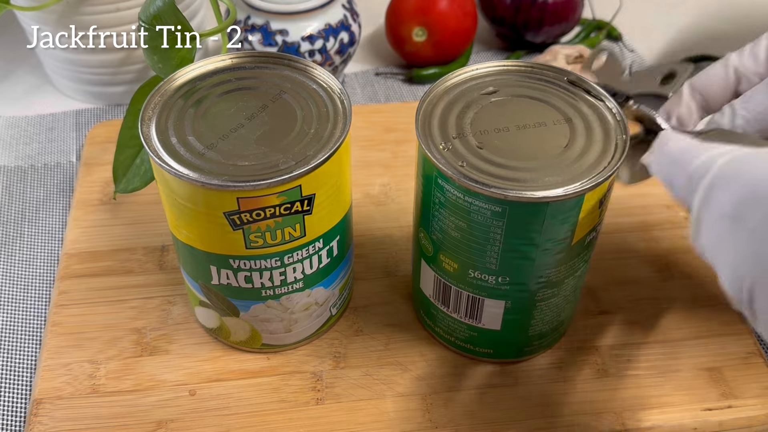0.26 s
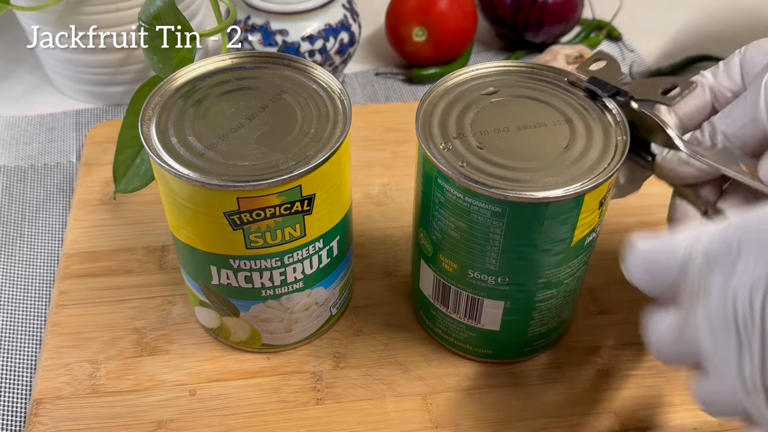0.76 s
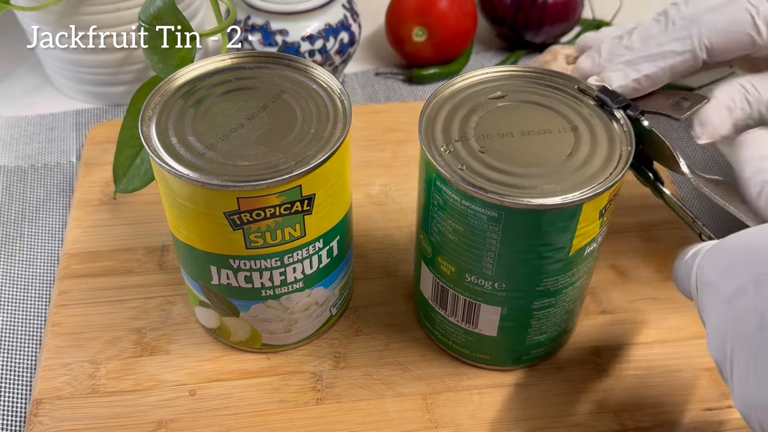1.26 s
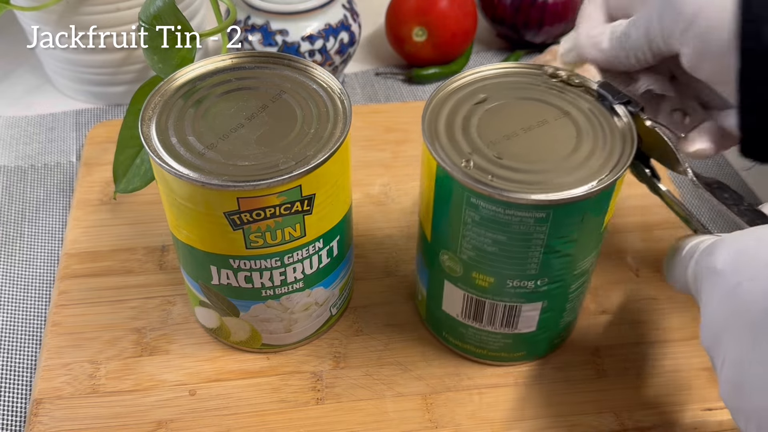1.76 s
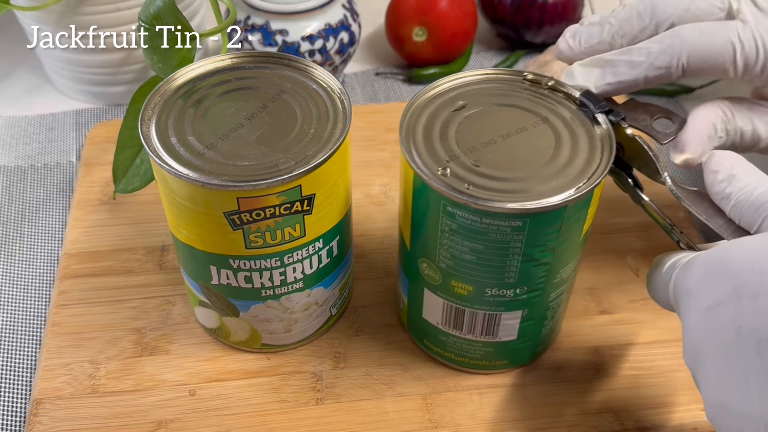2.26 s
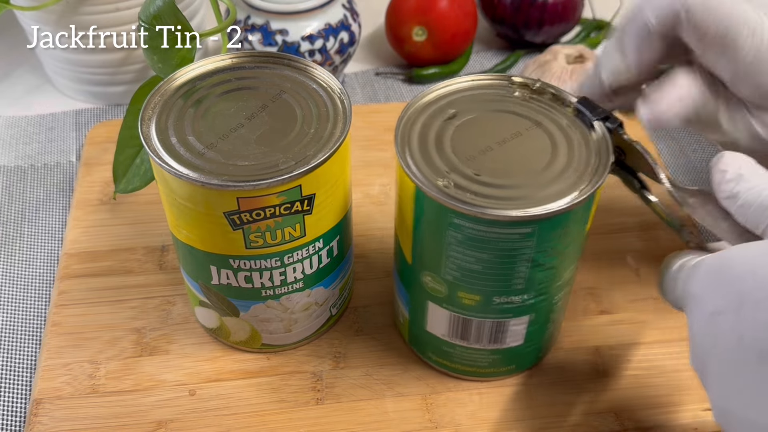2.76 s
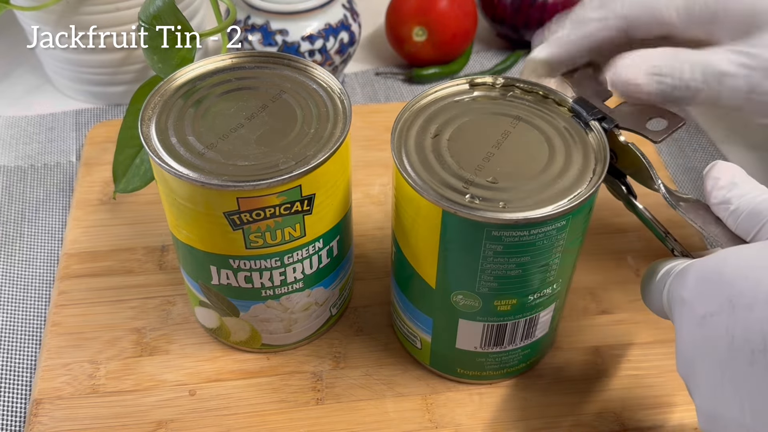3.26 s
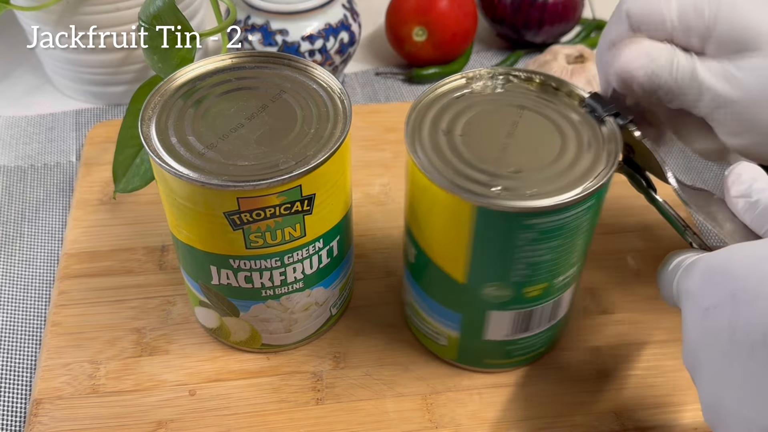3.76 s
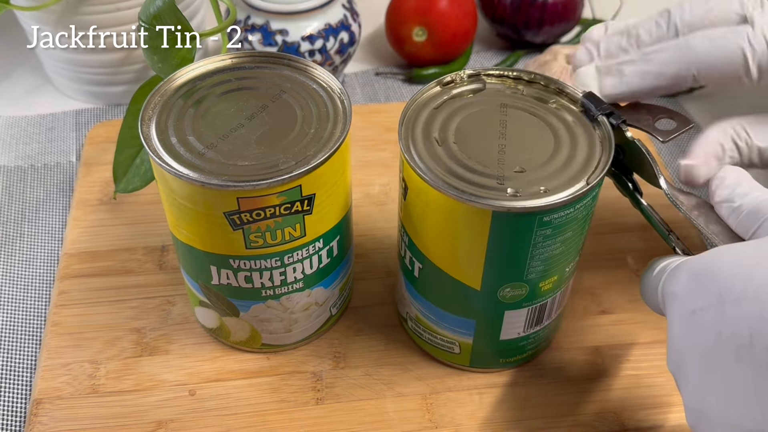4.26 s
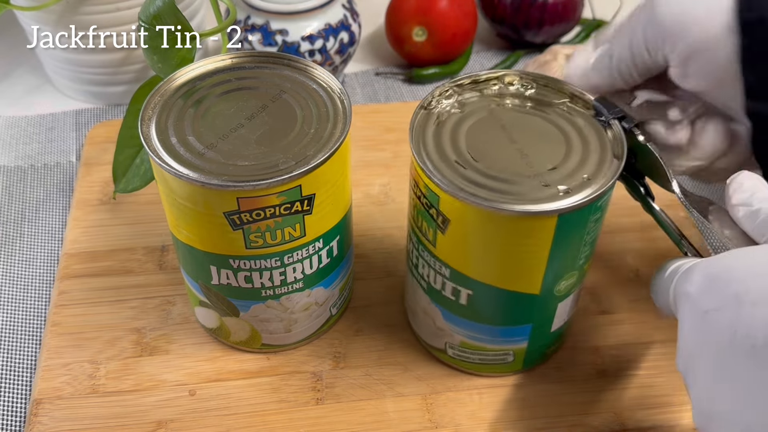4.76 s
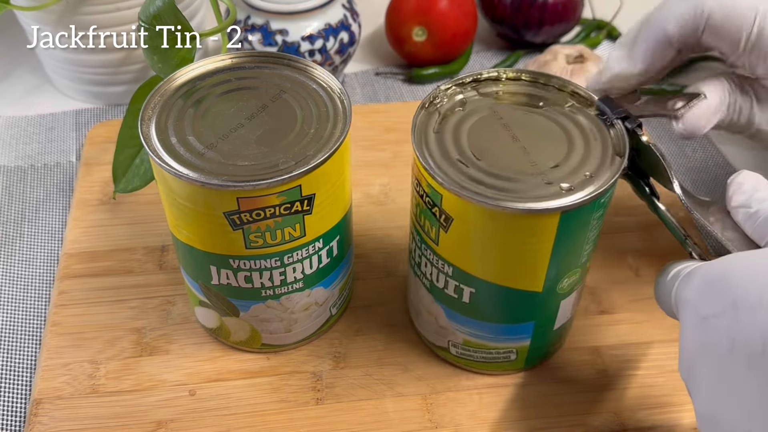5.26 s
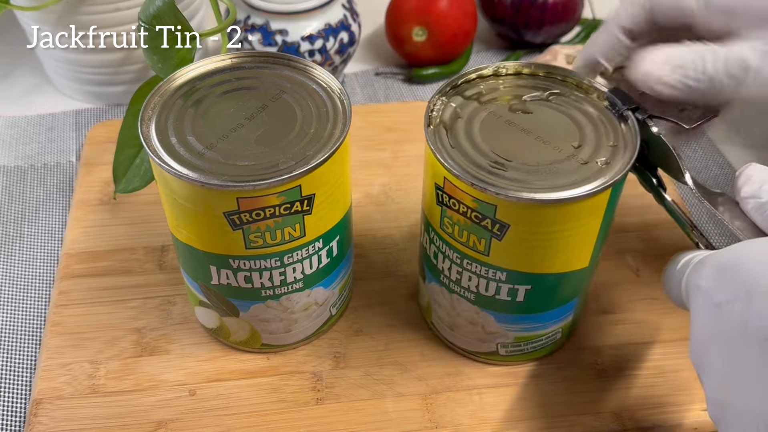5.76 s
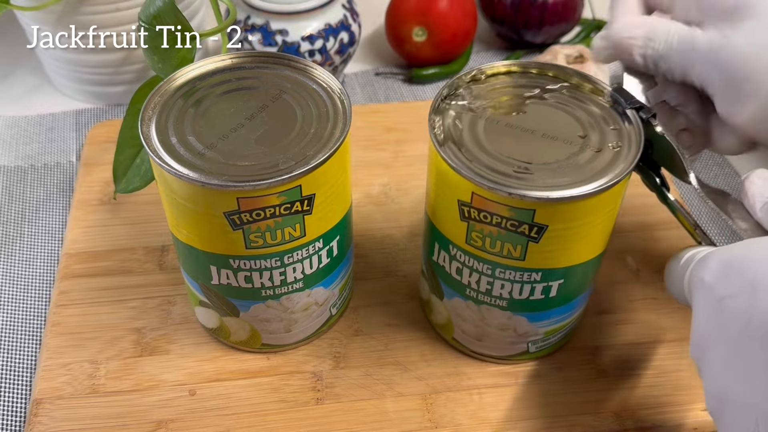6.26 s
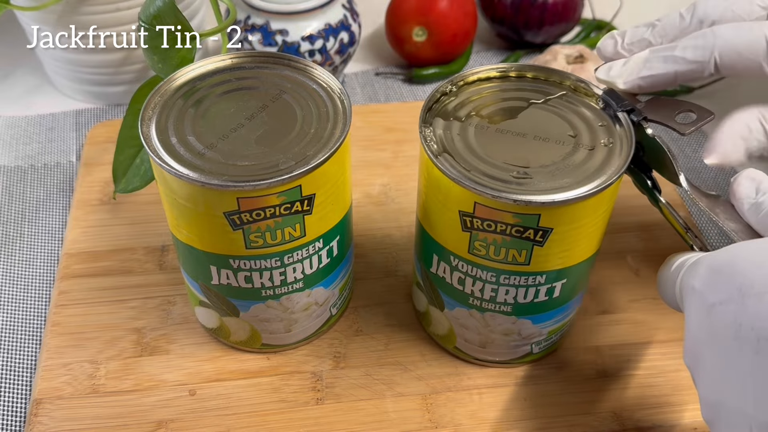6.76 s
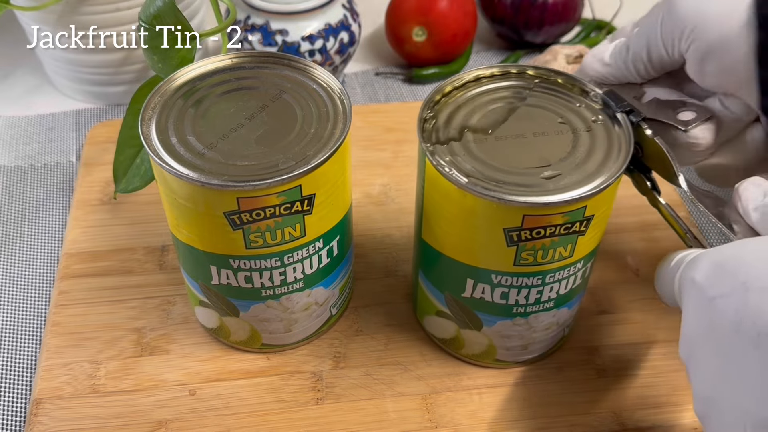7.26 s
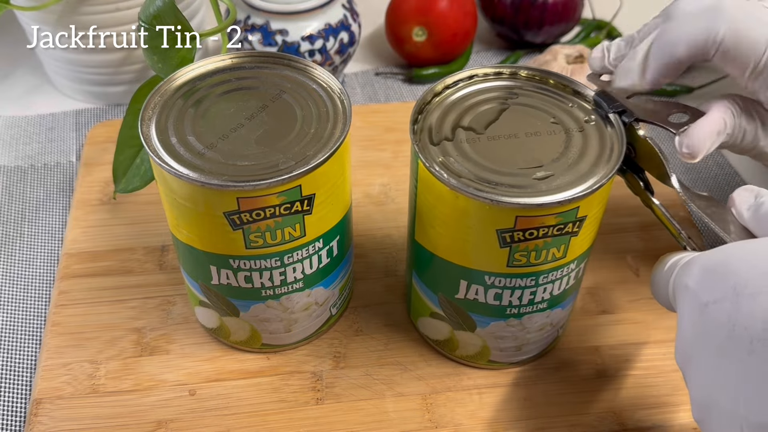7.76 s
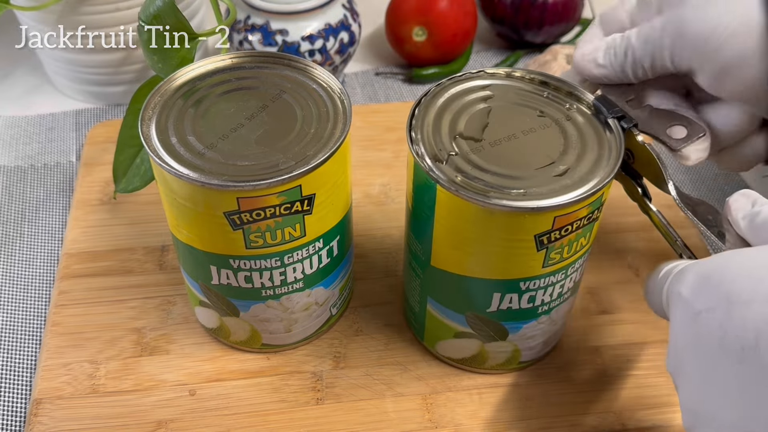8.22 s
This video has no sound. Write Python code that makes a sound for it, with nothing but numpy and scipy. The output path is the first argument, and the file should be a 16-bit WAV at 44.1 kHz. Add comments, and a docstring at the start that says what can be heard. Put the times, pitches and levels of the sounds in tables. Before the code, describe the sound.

Close up in a quiet kitchen, steel clatters on a tin's rim, then repeated short gritty crunches cut the lid and shake a wooden board.

```python
"""In a kitchen, a hand-cranked opener is clamped on a full steel tin that stands on a wooden board.
A gloved hand rustles (friction noise), steel strikes the rim (noise cracks and ringing modes), small parts tick.
Each turn grinds the wheel through the lid in random slips that crack the steel, ring the tin and shake the board.
The tin knocks on the board (a blow swept down by bending waves), the lid squeaks (wavering sines), and after
each turn the glove slides to a new grip."""
import sys
import numpy as np
from scipy import signal
from scipy.fft import rfft, irfft, next_fast_len
from scipy.io import wavfile
from scipy.ndimage import uniform_filter1d

SR = 44100
rng = np.random.default_rng(int(sys.argv[2]) if len(sys.argv) > 2 else 0)


def put_to_file(sound):
    """Save the sound as 16-bit audio at rate SR, in the file named by the first command-line argument."""
    columns = np.atleast_2d(sound).T  # one column per channel
    safe = np.clip(columns, -1, 1)
    whole_steps = np.round(safe * 32767)
    wavfile.write(sys.argv[1], SR, whole_steps.astype(np.int16))


N = 374409
RING = 16384  # samples in one impulse response
T = np.arange(RING) / SR


def amp(db):
    """Decibels to gain."""
    return 10 ** (np.asarray(db) / 20)


def unit(x):
    """Scales to energy 1."""
    return x / np.sqrt(np.sum(x ** 2) + 1e-20)


def read(points, hz):
    """Interpolates a table on a log-frequency axis."""
    f, value = np.transpose(points)
    return np.interp(np.log(hz + 1), np.log(f + 1), value)


def add(mix, start_s, sound):
    """Mixes a sound in at start_s."""
    part = mix[max(round(start_s * SR), 0):][:len(sound)]
    part += sound[:len(part)]


def causal(points):
    """Minimum-phase impulse response with the given spectrum."""
    hz = abs(np.fft.fftfreq(RING, 1 / SR))
    log_gain = np.log(amp(read(points, hz)))
    return np.fft.ifft(np.exp(np.conj(signal.hilbert(log_gain)))).real


def colour(x, points):
    """Filters by a spectrum."""
    return signal.oaconvolve(x, causal(points))[:len(x)]


def noise_burst(t60_s):
    """White noise that dies by 60 dB in t60_s."""
    return rng.standard_normal(RING) * amp(-60 * T / t60_s)


def echoes(decay):
    """Dense random reflections, each band dying at its own speed."""
    hz, t, z = signal.stft(rng.standard_normal(RING), SR, nperseg=256)
    fade = amp(-60 * t / read(decay, hz)[:, None])
    return signal.istft(z * fade, SR, nperseg=256)[1][:RING] / np.sqrt(SR)


def ring(modes, spread_db, length=1, detune=0):
    """Dying modes, whose strength and pitch depend on the spot that is struck and on the grip."""
    hz, db, t60_s = np.transpose(modes)[:, :, None]
    db = db + spread_db * rng.standard_normal(hz.shape)
    hz = hz * (1 + detune * rng.standard_normal(hz.shape))
    decay = amp(db - 60 * T / (t60_s * length))
    sign = rng.choice([-1, 1], hz.shape)
    return (decay * np.sin(2 * np.pi * hz * T) * sign).sum(0)


def bend(x, lag_s):
    """Bending waves in the board: delay falls as 1 / sqrt(Hz) from 60 Hz to 3 kHz, so bass arrives last."""
    hz = np.fft.rfftfreq(2 * RING, 1 / SR)
    delay_s = lag_s * np.maximum(np.sqrt(100 / np.maximum(hz, 60)) - np.sqrt(100 / 3000), 0)
    phase = 2 * np.pi * np.cumsum(delay_s) * hz[1]
    return irfft(rfft(x, 2 * RING) * np.exp(-1j * phase))[:RING]


def slips(count, per_s, spread_db):
    """Random clicks of very uneven size."""
    happens = rng.random(count) < per_s / SR
    size = amp(spread_db * np.minimum(rng.exponential(1, count), 4))
    return happens * size * rng.choice([-1, 1], count)


def steady(x, size):
    """Holds the running rms near 1 and keeps the fine grain; size in samples."""
    power = uniform_filter1d(uniform_filter1d(x ** 2, size), size)
    return x / np.sqrt(abs(power) + 1e-14)


def flutter(x, depth_db):
    """Friction catches and lets go: random patches of level, about 12 ms long and 6 kHz wide."""
    z = signal.stft(x, nperseg=256)[2]
    patches = uniform_filter1d(rng.standard_normal(z.shape), size=36, axis=0)
    patches = uniform_filter1d(patches, size=4, axis=1)
    return signal.istft(z * amp(depth_db * patches / patches.std()), nperseg=256)[1][:len(x)]


def effort(t, rise_s, shape):
    """Level in dB of a hand movement: attack, hold, release."""
    start_db, hold_s, release_db_per_s = shape
    attack = start_db * np.maximum(1 - t / rise_s, 0)
    return attack - release_db_per_s * np.maximum(t - rise_s - hold_s, 0)


# As the lid comes free the tin rings lower, and more faintly under knocks, turns and bites.
SAG_PER_S, RING_FADE_DB_PER_S = .005, 3
# Ringing modes of the tin. Each row: frequency in Hz, level in dB, t60 in s.
TIN_MODES = [(732, -2.5, 0.3), (968, 0.5, 0.081), (1290, -11, 0.084), (1463, -1, 0.038), (1560, 4.5, 0.078),
             (1534, -20.5, 0.82), (1579, 2.5, 0.12), (1965, -5.5, 0.042), (2099, -9.5, 0.22),
             (3030, -3, 0.075), (3500, -16, .09), (3656, -0.5, 0.039), (4013, -10, .06),
             (4620, -22.5, 0.14), (5250, -28.5, 0.048)]


def tin_modes(s):
    """The tin's modes at time s, sinking as the cut grows."""
    return [(hz * (1 - SAG_PER_S * s), db, t60_s) for hz, db, t60_s in TIN_MODES]


# Faint background of the kitchen. Each row: frequency in Hz, gain in dB.
AIR_SPECTRUM = [(20, -30), (60, -22), (120, -6.5), (300, -11), (800, -23.5), (4000, -29), (9000, -27),
                (16000, -34)]


def kitchen_air(air_db):
    """Steady coloured noise, its rms set by air_db."""
    return amp(air_db) * np.sqrt(N) * unit(colour(rng.standard_normal(N), AIR_SPECTRUM))


# Rustle while the opener is being seated. Each row: time in seconds, relative level in dB.
SEATING = [(0, -72), (.33, -68.5), (.6, -72.5), (.95, -63.5), (1.2, -78.5), (1.4, -63.5)]
# Turns of the key. Each row: start in seconds, time to full force in s, and relative levels in dB of the
# board's shudder, the lid's crunch and the following regrip's rustle, then length of that regrip in s.
TURNS = [(1.3, 0.05, -44.5, -56, -66.5, 0.35), (1.54, 0.063, -40, -51.5, -62, 0.4),
         (1.799, 0.0046, -51.5, -59, -63.5, 0.21), (2.68, 0.11, -36, -46, -60.5, .6),
         (3.6, 0.13, -31.5, -48.5, -60.5, 0.63), (4.46, 0.1, -31, -45.5, -61.5, .5),
         (5.28, 0.077, -32, -44.5, -59, .3), (6.08, 0.07, -30, -47, -63, 0.39),
         (6.95, 0.07, -28.5, -45.5, -67.5, 0.52), (7.82, 0.05, -30.5, -44.5, -62.5, 0.26)]
# The glove lets go and slides to a new grip. One row: starting level in dB, hold in s, release in dB per s.
REGRIP_SHAPE = (-10, 0.016, 27)
REGRIP_AFTER_S, REGRIP_RISE_S = .34, 0.047
# Spectra of a glove sliding on steel, the shaken board, the crunching lid.
# Each row: frequency in Hz, gain in dB.
SLIDE_SPECTRUM = [(200, -15), (1000, -1), (3200, 8), (5000, 3), (8000, 7), (11000, 7), (14300, 4.5),
                  (16000, -10)]
SHUDDER_SPECTRUM = [(20, -47), (42, -5.5), (57, 12.5), (80, 4), (110, 15.5), (137, 2), (230, 0), (400, -5),
                    (560, -14.5), (2000, -41), (16000, -76)]
CRUNCH_SPECTRUM = [(200, -12.5), (500, 6.5), (900, -2.5), (1550, -6.5), (1950, -10), (2500, -3.5),
                   (3800, -11.5), (5000, -22), (9000, -27.5), (16000, -23)]


def glove(grain=0.59, bump_db=-2, rest_db=-84, jiggle_db=-14, jiggles_per_s=25):
    """Swells of fine friction grains; the same pressure nudges the tin on the board and jiggles the opener."""
    when_s, seat_db = np.transpose(SEATING)
    pressure = amp(rest_db) + np.interp(np.arange(N) / SR, when_s, amp(seat_db), right=0)
    for s, *_, db, length_s in TURNS:
        t = np.arange(0, length_s, 1 / SR)
        swell = amp(db + effort(t, REGRIP_RISE_S, REGRIP_SHAPE))
        fade_out = np.minimum(1, (length_s - t) / REGRIP_RISE_S)
        add(pressure, s + REGRIP_AFTER_S, swell * fade_out)
    fizz = unit(rng.standard_normal(N)) + grain * unit(slips(N, per_s=1200, spread_db=5.5))
    fizz = flutter(colour(fizz, SLIDE_SPECTRUM), depth_db=4.0)
    bumps = colour(slips(N, per_s=160, spread_db=4.5), SHUDDER_SPECTRUM)
    touch = unit(causal(CRUNCH_SPECTRUM)) + unit(ring(TIN_MODES, spread_db=3, length=.8))
    jiggle = signal.oaconvolve(slips(N, per_s=jiggles_per_s, spread_db=2), touch)[:N]
    rustle = unit(fizz) + amp(bump_db) * unit(bumps) + amp(jiggle_db) * unit(jiggle)
    return pressure * np.sqrt(N) * rustle


def chatter(bounce_db=-11, bounce_s=.0045, count=5):
    """Steel lands on steel and rebounds a few times, unevenly and ever more weakly."""
    train = 1. * (T == 0)
    for k, s in enumerate(np.cumsum(bounce_s * (.5 + rng.random(count)))):
        add(train, s, rng.choice([-1, 1], 1) * amp(bounce_db) / np.sqrt(k + 1))
    return train


# Steel strikes the rim. Each row: start in seconds, relative level in dB, extra level of the crack in dB,
# extra level of the ring in dB, most excited frequency in Hz, factor on the ring's length.
CLACKS = [(0.0411, -24, 3, 1.5, 3700, 0.68), (.138, -35, -17, 2, 1730, 1.3),
          (0.249, -25.5, -0.5, -2.5, 930, 0.83), (0.439, -27.5, 2, -4.5, 845, 1.2),
          (.485, -24.5, -5, 3, 1700, 0.82), (0.4921, -36.5, 12.5, 6, 1680, 2.2),
          (1.377, -43, -23, 3.5, 865, 0.72), (4.519, -32, -24, -18, 1420, 0.24),
          (5.339, -23, -30, 3, 760, 0.53), (6.196, -19.5, -19.5, 2, 1095, 0.41),
          (7.869, -33, -6, 5.5, 1100, 0.9)]
# Spectra of the sharp crack and of a blow on the board. Each row: frequency in Hz, gain in dB.
CRACK_SPECTRUM = [(700, -8), (1400, -35.5), (2400, -25.5), (3600, 9.5), (6000, -4), (8000, 6), (12000, 0.5),
                  (16000, -1)]
BLOW_SPECTRUM = [(30, -11), (60, 10), (88, 6.5), (107, 17.5), (135, 7), (175, -0.5), (220, 6), (265, 4),
                 (365, 6.5), (500, -1.5), (1000, -6), (1500, -14), (2200, -27), (3300, -28), (5000, -64),
                 (16000, -42.5)]
# Decay of the board's echoes. Each row: frequency in Hz, t60 in s.
BOARD_DECAY = [(100, 0.16), (400, 0.1), (1000, 0.071), (3000, 0.037), (10000, 0.039)]
# The opener's many faint partials. One row: lowest and highest frequency in Hz.
JANGLE_HZ = (2677, 5790)


def clacks(ring_db=-2, rattle_db=-4, rattle_t60_s=0.026, crack_t60_s=0.022, focus_db=10,
           thud_db=-18, jangle_db=-14, jangle_t60_s=0.055, count=36):
    """A sharp crack, then the opener chatters on the rim and jangles; the tin rings, the board thuds lightly."""
    out = np.zeros(N)
    partials = [(hz, 0, jangle_t60_s) for hz in rng.uniform(*JANGLE_HZ, count)]
    for s, db, crack_db, tone_db, hz, length in CLACKS:
        contact = [(hz / 2.46, -focus_db), (hz, 0), (hz * 2.6, -focus_db)]
        bounces = chatter()
        crack = colour(noise_burst(crack_t60_s), CRACK_SPECTRUM)
        rattle = colour(noise_burst(rattle_t60_s), CRUNCH_SPECTRUM)
        tone = ring(tin_modes(s), spread_db=0, length=length, detune=0.0014)
        jangle = ring(partials, spread_db=0.5, length=length)
        rattle, tone, jangle = (colour(signal.fftconvolve(x, bounces)[:RING], contact)
                                for x in (rattle, tone, jangle))
        thud = bend(colour(echoes(BOARD_DECAY), BLOW_SPECTRUM), lag_s=0.01343)
        parts = ((crack, crack_db), (rattle, rattle_db), (tone, ring_db + tone_db),
                 (jangle, jangle_db), (thud, thud_db))
        add(out, s, sum(amp(db + part_db) * x / abs(x).max() for x, part_db in parts))
    return out


# The key and the cut edge snap and tick. Each row: start in seconds, peak level in dB, centre in Hz.
TICKS = [(0.2117, -40, 7060), (0.994, -41.5, 5900), (1.301, -39.5, 3500), (1.997, -36.5, 2880),
         (2.123, -30.5, 11500), (2.16, -35, 10400), (2.5504, -42.5, 3500), (2.9902, -26, 3200),
         (3.122, -36, 3700), (3.218, -39, 13900), (4.011, -8.5, 3900), (4.025, -27, 4180),
         (4.613, -34.5, 3500), (4.69, -35.5, 12600), (5.2986, -35.5, 13100), (5.5893, -34, 6940),
         (5.742, -25, 6800), (5.772, -25, 7200), (6.4392, -36.5, 13500), (6.476, -41.5, 3080),
         (6.711, -42.5, 12200), (7.093, -32, 9350), (7.3547, -27.5, 3300), (8.223, -36, 3260)]
# The key's short steel ring. Each row: frequency in Hz, level in dB, t60 in s.
KEY_MODES = [(2050, -3.5, .018), (2800, 8, 0.0099), (3700, 3, 0.011), (5320, -6, 0.018)]


def ticks(below_db=-8, above_db=-6, top_db=-9, bass_db=-21, t60_s=0.017, key_db=-5):
    """Small steel parts meet: a broad, short burst around one pitch, with the short ring of the key."""
    out = np.zeros(N)
    for s, db, hz in TICKS:
        burst = unit(noise_burst(t60_s)) + amp(key_db) * unit(ring(KEY_MODES, spread_db=-0.5))
        spectrum = [(hz / 8, bass_db), (hz / 2, below_db), (hz, 0), (hz * 2, above_db), (hz * 5, top_db)]
        tick = colour(burst, spectrum)
        add(out, s, amp(db) * tick / abs(tick).max())
    return out


def board_wave(lag_s=0.01748, lag_spread=0.26):
    """One blow crosses the board: a quick fall in pitch into its low ring, roughened by edge echoes."""
    blow = causal(BLOW_SPECTRUM)
    edge_echoes = echoes(BOARD_DECAY) * (1 - np.exp(-T / .003))
    wave = blow + 7.5 * signal.fftconvolve(blow, edge_echoes)[:RING]
    return unit(bend(wave, lag_s * (1 + lag_spread * rng.uniform(-0.89, 1))))


# The tin knocks on the board. Each row: start in seconds, relative level in dB, extra bass in dB,
# extra treble in dB (hardness).
KNOCKS = [(0.2499, -49.5, -13, 6), (0.281, -43, 4.5, 5.5), (0.611, -58.5, -5.5, -6), (1.411, -54, 3.5, -14),
          (1.97, -46, 5.5, 0), (2.259, -42, -14, -10), (2.454, -58.5, -10, -12), (2.478, -55.5, -8, -7),
          (2.844, -42.5, 6.5, 0), (2.996, -52.5, 8.5, 0), (3.206, -48.5, 6.5, -1.5),
          (3.4201, -50.5, 3.5, -1.5), (3.472, -54, 4, -9.5), (4.009, -43.5, -8, -12), (4.0978, -48, 8, 0.5),
          (4.304, -44, 0.5, 6), (4.5195, -32.5, -1, 4), (4.603, -42, -5, 5.5), (4.763, -50, 2.5, -9.5),
          (4.96, -49.5, 7.5, 3), (5.1671, -42.5, 4, 2), (5.4943, -51, 3, -3), (5.7164, -46.5, 6.5, 6.5),
          (6.123, -37, 1.5, -8), (6.583, -42.5, 3, 7), (7.0087, -39, 2, 8.5), (7.225, -53.5, -6, -4),
          (7.414, -53, -2, -4), (7.675, -59.5, 1.5, -27), (7.867, -40, -0.5, 3.5), (7.926, -38, -14, 2),
          (8.094, -54, -1, -2.5), (8.2723, -50.5, 1, 3)]
# The tin's wall booms on after a knock. One row: frequency in Hz, level in dB, t60 in s.
WALL_MODE = (735, -11, 0.15)


def knocks(level_db=5.0, tin_db=-19, bounce_db=-10, bounce_s=.008):
    """The tin rocks onto the board and bounces once; the board sweeps down to a thud, tin and wall ring on."""
    out = np.zeros(N)
    wall_hz, wall_db, wall_t60_s = WALL_MODE
    for s, db, weight_db, hard_db in KNOCKS:
        tin = ring(tin_modes(s), spread_db=13.5, length=1.0, detune=0.0053)
        tin = unit(colour(tin, BLOW_SPECTRUM))
        wall = ring([(wall_hz * (1 - SAG_PER_S * s), 0, wall_t60_s)], spread_db=0, detune=.01)
        wall = amp(wall_db + 3 * rng.standard_normal()) * unit(wall)
        # the far side of the base lands one to two bounce_s later
        bounce = np.roll(board_wave(), round(SR * bounce_s * (1 + rng.random())))
        wave = unit(board_wave() + amp(bounce_db) * bounce)
        wave = wave + amp(-RING_FADE_DB_PER_S * s / 2) * (amp(tin_db) * tin + wall)
        wave = colour(wave, [(120, weight_db), (240, 0), (550, 0), (1100, hard_db)])
        add(out, s, amp(db + level_db) * np.sqrt(SR / 20) * wave)
    return out


# Every turn builds up, holds and slackens. One row: starting level in dB, hold in s, release in dB per s.
SHUDDER_SHAPE = (-14, 0.091, 157)
CRUNCH_SHAPE = (-10, 0.075, 129)
TURN_S = 0.37


def cutting(shudder_db=-4, crunch_db=-4.0, ring_db=-1, tin_db=-4, fizz_db=-35, fizz_follow=0.63,
            scatter=16.3, slips_per_s=40, slip_db=5, count=6):
    """The wheel sticks and slips: each slip cracks the steel, rings the tin, shakes the board, over a scrape."""
    shakes = []
    for _ in range(count):
        shake = colour((T == 0) + scatter * echoes(BOARD_DECAY), SHUDDER_SPECTRUM)
        shakes.append(unit(bend(shake, lag_s=0.0146)))
    rim = []
    for _ in range(2 * count):
        crack = unit(colour(noise_burst(0.052), CRUNCH_SPECTRUM))
        tone = colour(ring(TIN_MODES, spread_db=10.5, length=0.5, detune=.08), CRUNCH_SPECTRUM)
        rim.append(crack + amp(ring_db) * unit(tone))
    rim = np.array(rim)
    out, t = np.zeros(N), np.arange(0, TURN_S, 1 / SR)
    for s, rise_s, board_db, lid_db, *_ in TURNS:
        low_db = board_db + effort(t, rise_s, SHUDDER_SHAPE)
        high_db = lid_db + effort(t, rise_s, CRUNCH_SHAPE)
        cracks = rng.permutation(rim)[:count]  # each turn bites other spots of the rim
        trains = [slips(len(t), per_s=slips_per_s, spread_db=slip_db) for _ in range(count)]
        low, high = (sum(signal.fftconvolve(a, b)[:len(t)] for a, b in zip(trains, spots))
                     for spots in (shakes, cracks))
        high = flutter(high, depth_db=3.0)
        fizz = flutter(colour(rng.standard_normal(len(t)), SLIDE_SPECTRUM), depth_db=5.5)
        tin = ring(tin_modes(s), spread_db=5.0, length=1.0, detune=0.0039)
        tin = signal.fftconvolve(sum(trains), tin)[:len(t)]
        tin = colour(tin, [(700, 9.5), (1600, -4.0), (2100, -5.5), (4000, -8.5)])
        layers = ((low, low_db + shudder_db), (high, high_db + crunch_db),
                  (fizz, fizz_follow * high_db + fizz_db),
                  (tin, high_db + tin_db - RING_FADE_DB_PER_S * s))
        turn = sum(amp(db) * steady(x, size=2200) for x, db in layers)
        add(out, s, turn * signal.windows.tukey(len(t), .05))
    return out


# The wheel's strongest bites through the lid. Each row: start in seconds, relative level in dB.
BITES = [(1.488, -53), (1.591, -52.5), (1.624, -44), (1.649, -52), (2.704, -48.5), (2.743, -43.5),
         (2.766, -45), (2.786, -46), (2.81, -52), (2.867, -52), (3.628, -49), (3.67, -45.5), (3.694, -41.5),
         (3.717, -38), (3.733, -38), (3.765, -39.5), (3.78, -40.5), (3.869, -54.5), (4.471, -46),
         (4.508, -38.5), (4.55, -45), (4.637, -41), (4.675, -45.5), (5.281, -47), (5.318, -49),
         (5.353, -44), (5.391, -37), (5.419, -35.5), (5.435, -49), (6.08, -52), (6.144, -42.5),
         (6.167, -47), (7.054, -51), (7.067, -46), (7.083, -44), (7.1, -39.5), (7.113, -42), (7.857, -41.5),
         (7.959, -41.5), (7.98, -46), (8.003, -40)]
# Spectrum of tearing steel. Each row: frequency in Hz, gain in dB.
TEAR_SPECTRUM = [(500, -16.5), (1400, 5.5), (3600, -5.5), (5200, -19.5), (16000, -15)]


def bites(crack_db=19, crack_t60_s=0.014, board_db=27, tin_db=27, bass_db=-6):
    """The lid gives way in one jerk: a dry steel crack, a light blow through the board, the ring of the lid."""
    out = np.zeros(N)
    for s, db in BITES:
        crack = unit(colour(noise_burst(crack_t60_s), TEAR_SPECTRUM))
        board = unit(colour(board_wave(), [(120, bass_db), (400, 0.0026)]))
        tin = ring(tin_modes(s), spread_db=4.5, length=0.47, detune=0.0064)
        tin = unit(colour(tin, [(1000, -5.5), (1560, -3), (2100, -8.5)]))
        tin_gain = amp(tin_db - RING_FADE_DB_PER_S * s)
        add(out, s, amp(db) * (amp(crack_db) * crack + amp(board_db) * board + tin_gain * tin))
    return out


# The opener's handle is bumped. One row: start in seconds, level in dB.
HANDLE_BUMP = (2.261, -50)
# Its ringing modes. Each row: frequency in Hz, level in dB, t60 in s.
HANDLE_MODES = [(1067, -7, 0.32), (1730, -4, 0.23), (2490, -9.5, 0.2)]


def handle():
    """The long steel handle rings briefly when it is bumped."""
    out = np.zeros(N)
    s, db = HANDLE_BUMP
    add(out, s, amp(db) * ring(HANDLE_MODES, spread_db=0))
    return out


# The wheel squeaks in the cut and the lid sings or groans.
# Each row: start in seconds, level in dB, frequency in Hz, length in s.
SQUEAKS = [(2.68, -51.5, 1551, 0.31), (3.6, -50, 1542, 0.23), (5.363, -35, 1370, 0.019),
           (6.195, -33.5, 910, 0.031), (7.918, -41.5, 469.6, 0.12), (7.94, -52.5, 854, 0.13),
           (8.006, -40, 1240, 0.023), (8.046, -49.5, 1260, 0.025), (8.258, -49.5, 487, 0.052)]


def squeaks(waver=0.026, fall=0.02, rough=0.42):
    """For a moment the slips lock to one resonance and make a rough, unsteady tone that sinks."""
    out = np.zeros(N)
    for s, db, hz, length_s in SQUEAKS:
        size = round(length_s * SR)
        # smoothed noise, scaled back to rms 1
        wobble, catch = uniform_filter1d(rng.standard_normal((2, SR)), 100)[:, :size] * 10
        pitch_hz = hz * (1 + waver * wobble + fall * np.linspace(.5, -.5, size))
        tone = np.sin(2 * np.pi * np.cumsum(pitch_hz) / SR)
        add(out, s, amp(db) * np.sqrt(np.hanning(size)) * (1 + rough * catch) * tone)
    return out


# Decay of the kitchen. Each row: frequency in Hz, t60 in s.
KITCHEN_DECAY = [(100, 0.75), (700, 0.3), (3000, 0.22), (8000, 0.34), (15000, 0.2)]


def kitchen(x, wall_db=-7):
    """A reflection from the wall and a short tail, different at each microphone."""
    sides = []
    for wall_s in (.0105, .0135):
        tail = unit(echoes(KITCHEN_DECAY) * (1 - np.exp(-T / 0.0013)))
        tail[round(wall_s * SR)] += amp(wall_db)
        sides.append(signal.oaconvolve(x, tail)[:N])
    return np.array(sides)


def scene(steel_room_db=-13, board_room_db=-14, air_db=-72, width=0.2):
    """All sources close to the microphones, in a quiet kitchen whose bass is nearly mono."""
    steel = glove() + clacks() + ticks() + handle() + squeaks()
    board = knocks() + cutting() + bites()
    board_send = colour(board, [(100, -6.5), (250, -0.5), (500, 0.5), (1200, 6.0)])
    left, right = kitchen(amp(steel_room_db) * steel + amp(board_room_db) * board_send)
    mid, side = left + right, left - right
    side = colour(side, [(100, -7.5), (500, 11.0), (1500, 7.5), (4000, 1.0), (9000, -25.5)])
    direct = steel + board + kitchen_air(air_db)
    return direct + mid / np.sqrt(2) + width * np.array([side, -side])


# Phase of the stereo widening: the left lags ever more above 8.3 kHz.
# Each row: frequency in Hz, lead of the left in radians.
WIDENING_PHASE = [(0, 0), (1900, -.3), (3100, .5), (4200, .4), (7000, -.5), (8300, 0), (9500, -np.pi),
                  (12750, -3 * np.pi), (16000, -5 * np.pi)]
# Balance of the microphone pair. Each row: frequency in Hz, left minus right in dB.
MIC_BALANCE = [(110, 0.9), (220, -0.5), (340, -3), (520, -1.5), (720, 7), (1200, 1.5), (4400, 0), (8000, 0)]


def record(dry, low_cut_hz=40, edge_hz=15900):
    """Level difference and stereo widening, low cut, then band limit."""
    size = next_fast_len(N + RING)
    hz = np.fft.rfftfreq(size, 1 / SR)
    balance = amp(read(MIC_BALANCE, hz) / 2)
    widening = np.exp(1j * np.interp(hz, *np.transpose(WIDENING_PHASE)))
    channels = np.array([balance * widening, 1 / balance])
    heard = irfft(rfft(dry, size) * channels, size)[:, :N]
    heard = signal.sosfilt(signal.butter(2, low_cut_hz, "high", fs=SR, output="sos"), heard)
    band_limit = signal.firwin(255, edge_hz, window=("kaiser", 8), fs=SR)
    return signal.oaconvolve(heard, band_limit[None], "same")


dry = scene()
out = record(dry)
put_to_file(out)
```